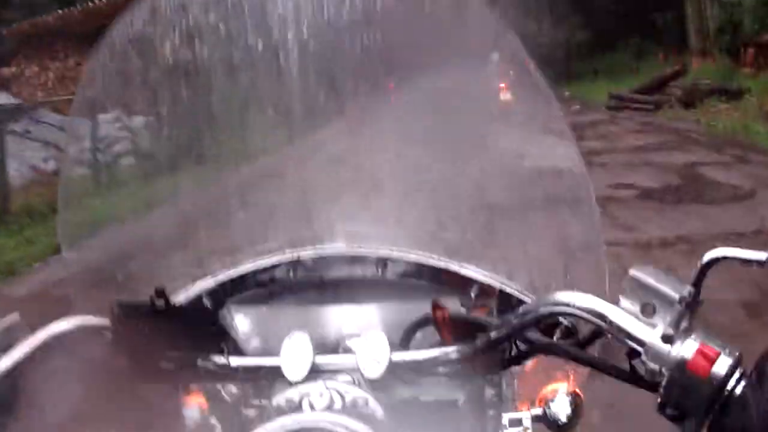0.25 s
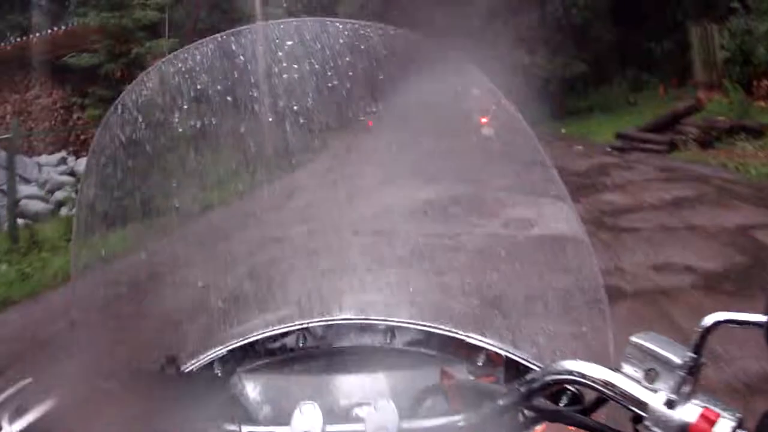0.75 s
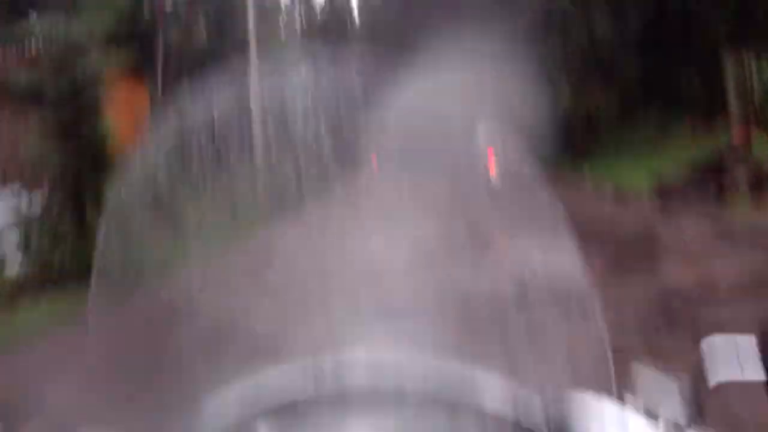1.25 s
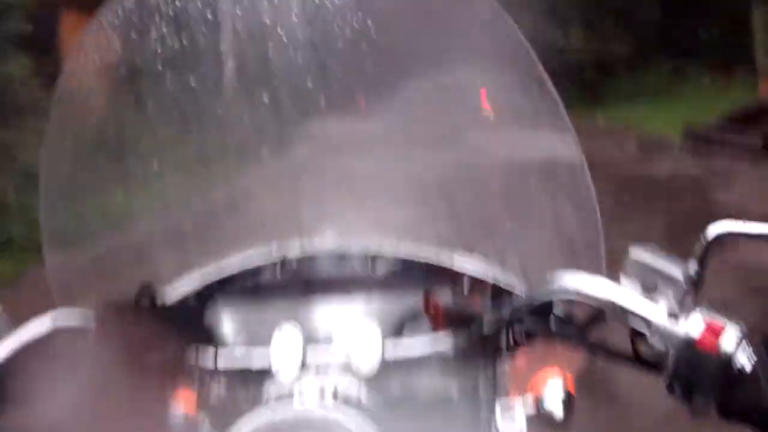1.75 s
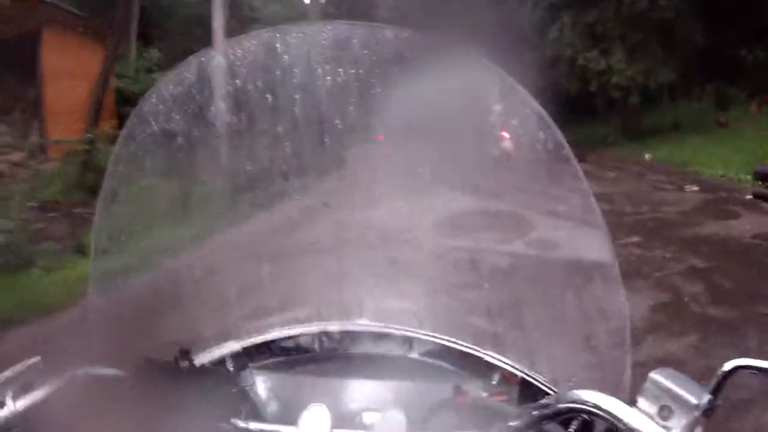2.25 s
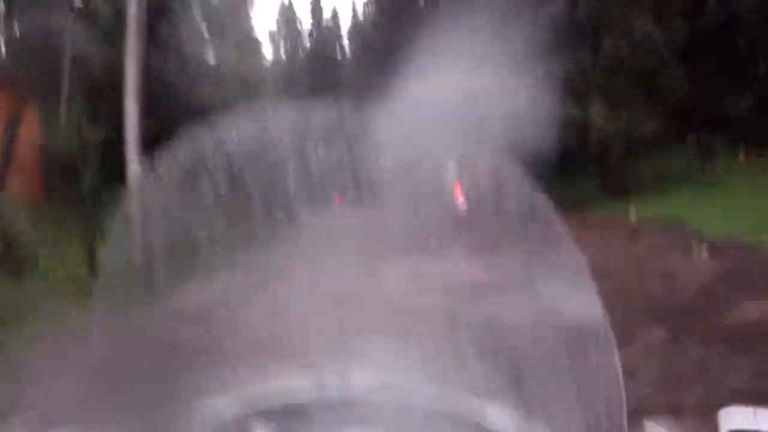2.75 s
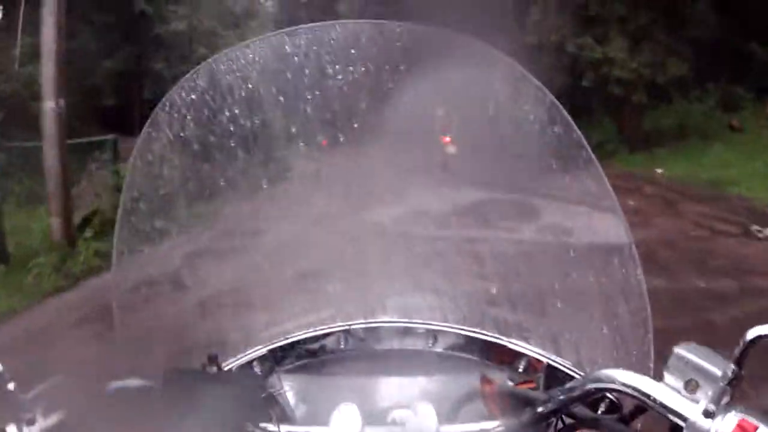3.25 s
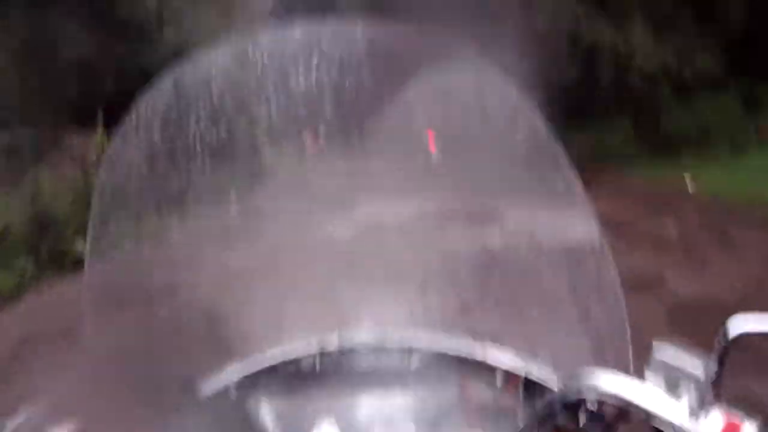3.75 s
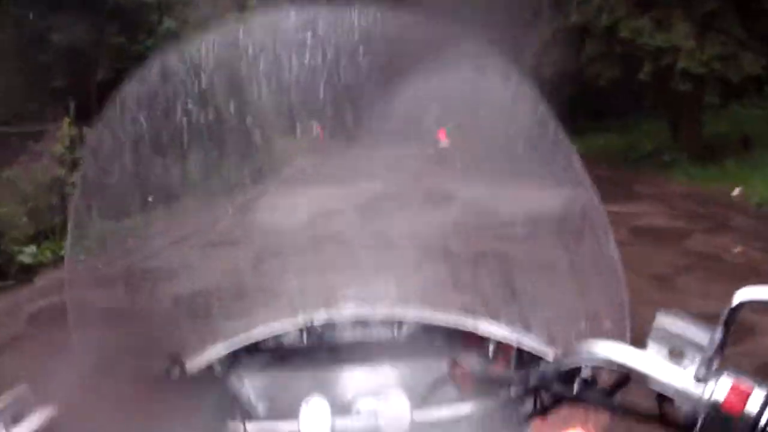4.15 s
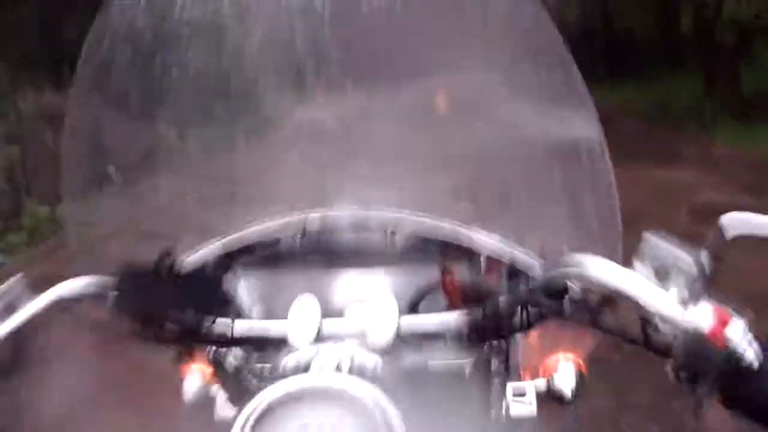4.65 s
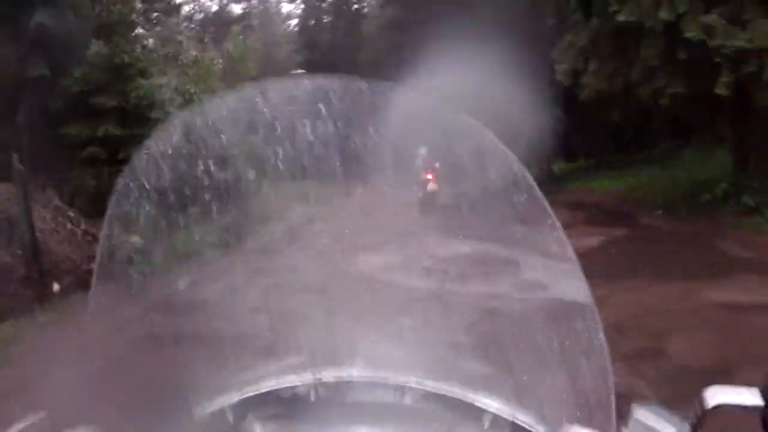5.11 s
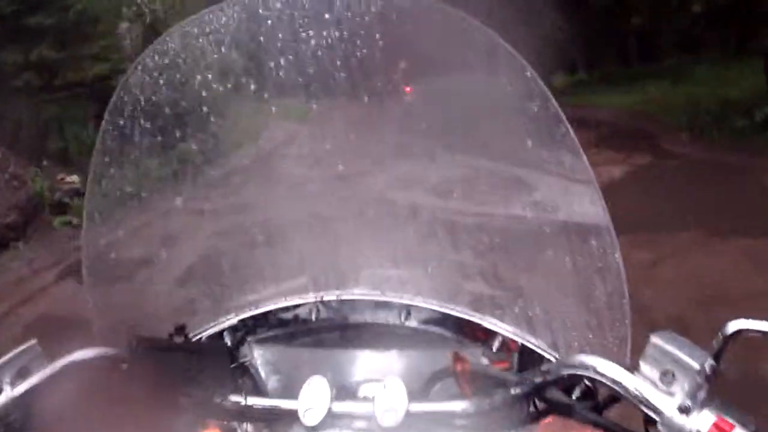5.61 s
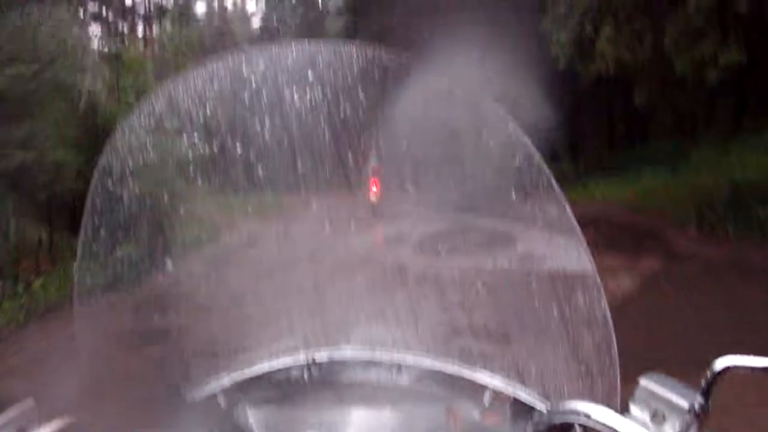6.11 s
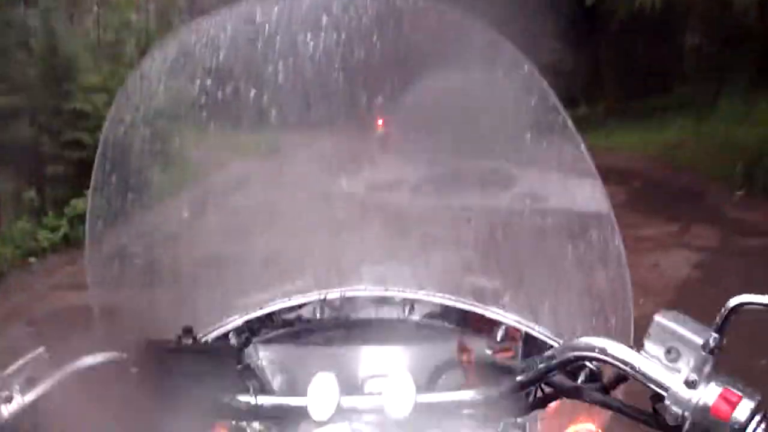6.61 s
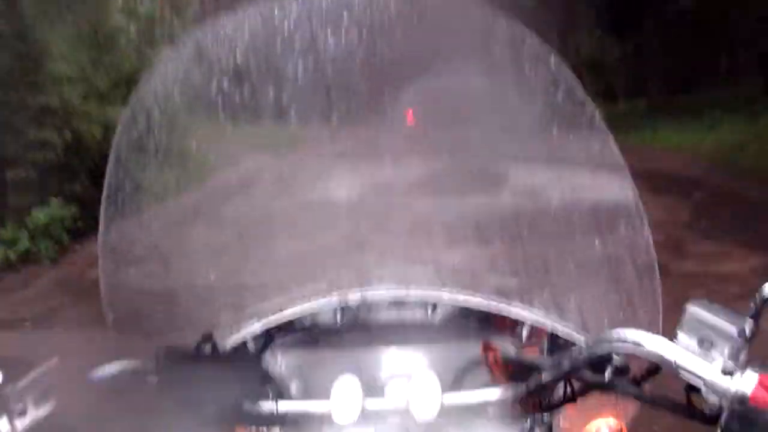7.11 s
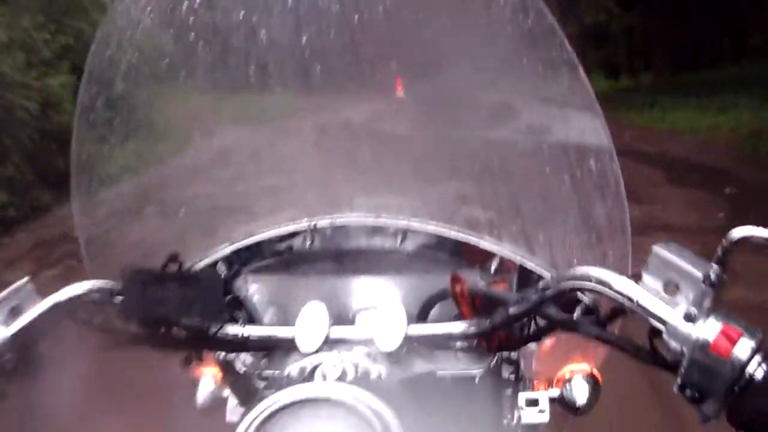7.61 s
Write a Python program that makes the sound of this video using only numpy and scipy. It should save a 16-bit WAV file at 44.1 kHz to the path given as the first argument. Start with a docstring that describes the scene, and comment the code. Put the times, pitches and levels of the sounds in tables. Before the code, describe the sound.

A V-twin motorcycle thumps along at low revs while a plastic housing rattles and raindrops tick against it.

```python
"""A wet, bumpy forest road, heard from inside a closed plastic camera housing on an idling V-twin
motorcycle. The exhaust thumps in uneven pairs as each firing rings the pipe. The housing rattles on
its mount, buzzes and ticks with raindrops, all through the same plastic resonances. Behind it sit
a faint treble ticking, rain hiss, road rumble and the slow pressure of the wind."""
import sys
import numpy as np
from scipy import signal
from scipy.fft import rfft, irfft, next_fast_len
from scipy.io import wavfile

SR = 44100
rng = np.random.default_rng(int(sys.argv[2]) if len(sys.argv) > 2 else 0)


def to_wav(s):
    """Save 16-bit WAV."""
    ch = np.atleast_2d(s).T  # columns
    pcm = np.round(np.clip(ch, -1, 1) * 32767)  # PCM
    wavfile.write(sys.argv[1], SR, pcm.astype(np.int16))


N = 347067
RUN_IN = 4410   # samples of engine before the start

# engine speed: t/s, rate/(cycles per s)
ENGINE_SPEED = [(0, 9.88), (0.27, 9.093), (0.47, 10.427), (0.68, 9.362), (1.28, 10.35), (1.38, 9.429),
                (1.79, 10.207), (2.0, 9.85), (2.29, 10.253), (2.57, 11.02), (2.67, 9.926), (3.04, 11.391),
                (3.44, 8.813), (3.65, 10.182), (4.51, 8.494), (4.72, 10.689), (4.93, 8.14), (5.04, 9.908),
                (5.28, 6.719), (5.42, 8.267), (5.89, 8.388), (6.54, 7.063), (6.68, 7.406), (7.24, 6.83),
                (7.64, 8.021), (7.87, 7.245)]
# throttle load, as the weight of the rear cylinder's thump: t/s, level/dB
THROTTLE = [(0, -19), (1.2, -20.5), (2.9, -19.5), (3.2, -21), (3.4, -24.5), (3.68, -21.5), (3.9, -27.5),
            (4.4, -23), (4.55, -20.5), (5.1, -20.5), (5.3, -26), (5.7, -27), (6.1, -27.5), (6.4, -26),
            (7.1, -27), (7.55, -22.5), (7.87, -19.5)]
# weak burns: t/s, level change/dB
STUMBLES = [(4.44, -15), (4.86, -2), (5.28, -1.5), (6.19, -6), (6.87, -5)]
def firings(first_s=.056, rear_phase=.424, front_db=-20.5, front_follows=.48, scatter_db=.67):
    """Times and gains of both cylinders' burns; the narrow V makes the gaps short, long, short, long."""
    t = np.arange(-RUN_IN, N) / SR
    phase = np.cumsum(np.interp(t, *np.transpose(ENGINE_SPEED))) / SR
    phase -= np.interp(first_s, t, phase)
    cycles = np.arange(-1, np.ceil(phase[-1]))
    front = np.interp(cycles, phase, t)
    rear = np.interp(cycles[:-1] + rear_phase, phase, t)
    times = np.r_[front, rear]
    load = np.transpose(THROTTLE)
    db = np.r_[front_db + front_follows * (np.interp(front, *load) + 20), np.interp(rear, *load)]
    for s, change_db in STUMBLES:
        db[np.argmin(abs(times - s))] += change_db
    return times, from_db(db + scatter_db * rng.standard_normal(len(db)))


# exhaust pipe resonances: f/Hz, level/dB, t60/s
PIPE_MODES = [(50.77, -20, 0.55), (57.9, -7.5, 0.2), (72, -12, 0.1), (103, -10.5, 0.084),
              (115.2, -17.5, 0.13), (231, -25.5, 0.056), (266, -19, 0.0048)]
def exhaust(lead_s=.00444, swell=.23, swell_s=.00725, soft_hz=188, crisp=3.1, echo=.19, echo_s=.03223):
    """Each firing is a small swell and then a sharp drop in pressure, and the pipe rings on."""
    times, gains = firings()
    onsets = times - lead_s
    out = 0
    for hz, db, t60 in PIPE_MODES:
        burns = gains * from_db(db + .8 * rng.standard_normal(len(times)))   # no two are alike
        if hz > 200:
            burns *= (gains / gains.mean()) ** crisp   # strong burns have a crisper edge
        push = swell * clicks(onsets - swell_s, burns) - clicks(onsets, burns)
        push -= echo * clicks(onsets + echo_s, burns)   # a weak return of the thump
        out = out + ring(push, hz, t60)
    pole = np.exp(-2 * np.pi * soft_hz / SR)   # a low-pass rounds off the thump
    return signal.lfilter([(1 - pole) ** 2], [1, -2 * pole, pole * pole], out)[RUN_IN:]


# knocks on the mount: t/s, level/dB, low-mode offset/dB, high-mode offset (hardness)/dB, scuff/ms
KNOCKS = [(0.061, -29.5, -8, -26, 3.8), (0.134, -36, -2, -9, 4.1), (0.241, -33.5, -19, -4.5, 4.8),
          (0.284, -26, -4.5, -26, 4.8), (0.329, -34, -41, -11, 2.8), (0.399, -38, -9, -20, 4.1),
          (0.476, -34, -30, -11, 2.6), (0.607, -24.5, -35, -12.5, 2.3), (0.637, -42, -30, -9, 3),
          (0.701, -27, -4.5, -20, 4.4), (0.808, -27, -15, -13, 2.9), (0.839, -42, -11, -22, 3.5),
          (0.947, -34.5, -40, -21, 1.4), (1.002, -35, -12, -20, 4.8), (1.009, -27.5, -22, -17, 1.5),
          (1.034, -32, -11, -28, 4.8), (1.046, -31.5, -14, -24, 8.5), (1.109, -35, -6, -26, 6.5),
          (1.172, -39.5, -9, -14, 3.5), (1.265, -51, -23, -25, 4.4), (1.277, -36, -15, -6, 2.2),
          (1.321, -40, -14, -4, 2.3), (1.346, -28.5, -16, -30, 6.6), (1.359, -31, -18, -19, 2),
          (1.392, -30.5, -15, -6, 6.7), (1.409, -29.5, -8, -24, 3.3), (1.545, -34.5, -12, -22, 4.3),
          (1.57, -40, -15, -14, 4.1), (1.584, -34.5, -23, -12.5, 3.1), (1.662, -38.5, -12, -15, 3.8),
          (1.721, -20, -11, -27.5, 6.1), (1.749, -36, -16, -7, 2), (1.857, -43, -25, -23, 4.3),
          (2.046, -45.5, -3, -24, 3.8), (2.066, -37, -18, -10.5, 2.6), (2.158, -36.5, -10, -13, 2.7),
          (2.201, -43.5, -8, -1, 3.7), (2.236, -43, -14, -24, 4.5), (2.272, -15, -39, -11.5, 2.4),
          (2.29, -35.5, -18, -3.5, 2.8), (2.328, -40, -5, -36, 4.7), (2.346, -32, -7.5, -32, 2.1),
          (2.38, -21.5, -19, -25, 4.7), (2.387, -20.5, -35, -26, 2), (2.438, -42, -41, -6, 2.6),
          (2.498, -40.5, -11, -25, 4.8), (2.563, -41.5, -7, -17, 3.5), (2.647, -43, -16, -16, 6.9),
          (2.681, -39, -33, -20, 3.5), (2.693, -28.5, -28, -22, 3.4), (2.753, -39.5, -23, -8, 2.7),
          (2.721, -44, -7, -18, 2.9), (2.769, -44.5, -21, -11, 2.8), (2.855, -28, -13, -13.5, 2.3),
          (2.946, -41, -8.5, -20, 4.9), (3.005, -27.5, -44, -1, 2.3), (3.195, -24.5, -18, -15, 4.2),
          (3.248, -37.5, -6, -7, 5.7), (3.292, -45, -18, -19, 2.6), (3.326, -41, -20, -29, 4.3),
          (3.377, -24, -34, -6, 0.44), (3.504, -38, -4, -16, 6.8), (3.57, -43.5, -24, -20, 2.1),
          (3.637, -25, -42, -11.5, 0.46), (3.706, -42, -22, -10, 3.5), (3.761, -34, -13, -21, 6.5),
          (3.809, -34.5, -0.5, -18, 3), (3.839, -40, -21, -7, 3), (3.877, -47, -14, -5, 6.1),
          (3.907, -36, -17, -17, 3), (4.004, -30.5, -12.5, -21, 4.5), (4.1, -38, -4, -30, 5.3),
          (4.132, -23, -25, -9, 2.3), (4.242, -43, -26, -11, 3.2), (4.257, -31.5, -26, -14, 3.9),
          (4.328, -35, -9, -32, 3.3), (4.415, -45, -22, -25, 3.1), (4.445, -44, -17, -9, 2.7),
          (4.696, -47.5, -22, -11, 3.5), (4.894, -36.5, -17, -25, 3.3), (4.961, -34, -11, -30, 4.7),
          (5.028, -37, -6, -19, 3.2), (5.035, -31.5, -7, -32, 3.9), (5.091, -34.5, -18, -9, 3.7),
          (5.132, -34.5, -22, -14, 6.4), (5.15, -39, -24, -23, 3.5), (5.175, -38, -16, -27, 6.5),
          (5.214, -29.5, -37, -10, 1.6), (5.23, -34.5, -30, -20, 3), (5.282, -41, -7, -23, 4.2),
          (5.319, -40, -7, -31, 6.1), (5.35, -22, -13.5, -23.5, 3.7), (5.364, -36, -1.5, -39, 4.8),
          (5.395, -29.5, -16, -21.5, 2.7), (5.425, -35, -7, -20, 3), (5.532, -42, -22, -5.5, 3),
          (5.796, -41.5, -5.5, -16, 5.6), (5.858, -44, -20, -12, 2.8), (5.961, -27.5, -15, -20, 9.1),
          (5.971, -31.5, -6, -17, 2.5), (5.984, -36.5, -3, -24, 3), (5.997, -26, -5, -16, 3.5),
          (6.02, -38.5, -17, -12, 2.3), (6.105, -49, -25, -11, 1.7), (6.254, -44.5, -23, -12, 2.6),
          (6.274, -35, -12, -22, 3.9), (6.293, -37, -20, -12, 2.6), (6.326, -43, -3, -26, 3.2),
          (6.347, -36.5, -11.5, -22, 4), (6.371, -42, -32, -16, 3.1), (6.433, -40.5, -32, -20, 3.5),
          (6.45, -38.5, -15, -7.5, 4.5), (6.504, -40.5, -15, -22, 2.7), (6.532, -31, -14, -16, 2.7),
          (6.56, -35.5, -25, -6, 2.7), (6.623, -38, -24, -17, 1.5), (6.71, -39, -21, -23, 9.3),
          (6.732, -36, -10.5, -19, 5.1), (6.796, -45, -6, -13, 4.2), (6.816, -39.5, -27, -15, 4.5),
          (6.913, -36.5, -11, -28, 6.6), (6.922, -31, -10, -18.5, 6.8), (6.97, -45.5, -4, -20, 3.5),
          (7.102, -20.5, -40, -12.5, 2.5), (7.147, -39, -30, -9, 2.6), (7.272, -35, -30, -13, 1.9),
          (7.313, -45.5, -33, 14, 2.9), (7.352, -44, -24, -2.5, 4.1), (7.389, -41.5, -25, -3.5, 3.4),
          (7.418, -33, -13, -8.5, 4.6), (7.454, -34, -15, -17, 5.1), (7.514, -30, -19, -14, 2.9),
          (7.57, -43, -27, -26, 2.6), (7.619, -43.5, -12, -12, 6), (7.708, -42, -22, -6, 2.3),
          (7.738, -32.5, -19, -11, 3.2), (7.769, -35, -8, -13, 2.2), (7.781, -25, -13.5, -20, 7.7)]
# a knock's mids at 1-1.35, 1.35-1.95, 1.95-2.5 kHz: offset/dB, share of hardness, dB per scuff doubling
KNOCK_MIDS = [(-9, 0.025, 1), (-11, 0.13, -2.5), (-17, 0.38, -1)]
def rattles(small_per_s=22, small_db=-52.5, usual_high_db=-16 - 1, usual_scuff_ms=3.5):
    """The housing knocks on its mount, small rattles between: drive for the six lower mode groups."""
    s, (size, low, high, length) = scattered(small_per_s)
    small = [s, small_db + 3 * size, -16 + 7 * low, -16 + 6 * high, 2 * from_db(.6 * length)]
    s, db, low_db, high_db, ms = np.hstack([np.transpose(KNOCKS), small])
    mids = [offset_db + share * (high_db - usual_high_db) + doubling_db * np.log2(ms / usual_scuff_ms)
            for offset_db, share, doubling_db in KNOCK_MIDS]
    scuffs = bursts(s, db + np.array([low_db, *mids]) + 4.5, ms, .13 * ms, lumps_db=4.5)
    # the stiff high modes feel only the first contact
    contact = bursts(s, [db + high_db], .25 * ms, .47 * ms, lumps_db=9)
    return np.vstack([scuffs, contact, contact])


# drops on the housing: t/s, level/dB, pitch/Hz, roll-off from the pitch/(dB per octave), splash/ms
RAINDROPS = [(0.022, -27.5, 9300, 25, 0.67), (0.1275, -39.5, 8800, 13, 1), (0.2424, -29, 6500, 18, 1),
             (0.33, -45, 2900, 8, 1), (0.607, -30.5, 10800, 2.5, 0.72), (0.8062, -31.5, 3600, 9, 0.98),
             (0.949, -32.5, 4040, 4, 0.46), (1.278, -38.5, 4200, 18, .94), (1.3913, -29.5, 12800, 2.5, 1),
             (1.5912, -45, 5500, 3, 0.83), (1.6618, -32.5, 6800, 25, 0.9), (1.7483, -27.5, 8700, 6, .96),
             (1.8578, -45.5, 9600, 9, .8), (2.2722, -28, 5940, -2, .67), (2.389, -21.5, 4670, -0.5, 0.74),
             (2.6815, -31.5, 12300, 7, .67), (2.7528, -46.5, 4000, 2.5, 0.44),
             (2.8577, -38, 3530, 14, 0.63), (3.0064, -18, 3840, 7, 0.31), (3.1975, -30, 4650, 9.5, 0.4),
             (3.215, -43, 5000, 10, .95), (3.376, -8, 3500, 13, 0.79), (3.638, -34.5, 9340, 6, 0.64),
             (3.684, -53, 5500, 3, .8), (4.131, -33, 4830, 8, 0.71), (5.1463, -42, 4800, 13, 0.73),
             (5.2151, -32, 10100, 2, 0.54), (5.232, -36, 9700, 7, 0.66), (5.6035, -49, 5470, 12, .7),
             (5.9963, -38, 4600, 19, 0.53), (6.0198, -48, 5000, 0, 0.37), (6.2905, -48, 3200, 10.5, .97),
             (6.5592, -35, 2930, 8, 1), (7.0996, -28.5, 10700, 14, 1), (7.2714, -43, 2900, 9, 0.99),
             (7.3135, -34.5, 3430, 0.5, 0.38), (7.42, -48, 5500, 3, 1), (7.5155, -37.5, 10100, 18, 0.86),
             (7.74, -36.5, 12700, 12, 0.49), (7.7681, -39.5, 10800, 2.5, 0.71)]
# centres of the five upper mode groups: f/Hz
SPLASH_BANDS = [3100, 5000, 7600, 10200, 13600]
def raindrops(small_per_s=2.5, small_db=-56, steeper_below=1.18):
    """Drops, with faint ones between, drive the five upper mode groups, hardest near their pitch."""
    s, (size, pitch, fall, length) = scattered(small_per_s)
    small = [s, small_db + 3 * size, 5000 * 2 ** (1.4 * pitch), 7 + 2 * fall, 1.3 * from_db(length)]
    s, db, hz, fall_db, ms = np.hstack([np.transpose(RAINDROPS), small])
    octaves = np.log2(np.c_[SPLASH_BANDS] / hz)
    loss_db = abs(fall_db * octaves * np.where(octaves < 0, steeper_below, 1))
    return bursts(s, db - loss_db, ms, .36 * ms, tail=.14)


def drop_pings(offset_db=-6.5, t60=.0048):
    """Each listed drop also rings briefly on its own pitch."""
    out, t = np.zeros(N + 600), np.arange(600) / SR
    for s, db, hz, _, ms in RAINDROPS:
        attack = 1 - np.exp(-t * 2000 / ms)
        decay = from_db(db + offset_db - 60 * t / t60)
        out[round(s * SR):][:600] += decay * attack * np.sin(2 * np.pi * hz * t)
    return out[:N]


def patter(per_s, spread_db=4):
    """Countless tiny impacts at random moments, a few larger; rms 1."""
    sizes = from_db(spread_db * np.minimum(rng.exponential(1, N), 5)) * rng.choice([-1, 1], N)
    return rms_one(sizes * (rng.random(N) < per_s / SR))


# plastic resonances: f/Hz, struck level/dB, t60/s, level in the steady buzz or rain/dB
HOUSING_MODES = [(648, -9.5, 0.034, -12.5), (711, -11, 0.13, -12), (915.5, -4.5, 0.06, -19),
                 (945, -5, 0.058, -16), (1066, 3.5, 0.022, 3), (1288, 1, 0.016, -39), (1415, -3, 0.036, -8),
                 (1570, 2.5, 0.021, 1.5), (1724, 0, 0.02, -3.5), (2216, 7.5, 0.0069, -7.5),
                 (3036, 5.5, 0.0027, 3.5), (3610, -2.5, 0.011, -7), (4150, 3, 0.0049, -3.5),
                 (5940, -5, 0.0036, -2.5), (6920, 4.5, 0.0046, -3), (9945, 7.5, 0.0031, -7),
                 (13060, 8.5, 0.0018, -5), (15100, -1, .004, -17)]
# crossovers between nine groups of modes that are struck alike: f/Hz
GROUP_EDGES = [1000, 1350, 1950, 2500, 3900, 6500, 9000, 11500]
def housing(buzz_db, rain_db):
    """Rattles, drops, patter and engine buzz all ring the same plastic shell."""
    struck = np.zeros((9, N))
    struck[:6] = rattles()
    drops = raindrops()
    struck[4:] += drops
    buzz = from_db(buzz_db - 28) * (rng.standard_normal(N) + 1.1 * patter(per_s=500))
    rain = from_db(rain_db - 18) * (rng.standard_normal(N) + .5 * patter(per_s=400))
    out = from_db(-13) * ring(drops[0], hz=350, t60=.004)   # a heavy drop also thuds
    for k, (hz, db, t60, steady_db) in enumerate(HOUSING_MODES):
        group = np.searchsorted(GROUP_EDGES, hz)
        steady = buzz if group < 4 else rain
        push = from_db(db) * struck[group] + from_db(steady_db) * steady
        out += (-1) ** k * ring(push, hz, t60)
    return out


# treble tick resonances: f/Hz, level/dB, t60/s, share of beats that sound
TICK_MODES = [(6000, -58.5, .012, .4), (8000, -63, .005, .5), (9200, -58.5, .005, .7),
              (10000, -59, .005, .7)]
def ticking(per_s=30.5, first_s=.03, jitter_s=.006, puff_ms=3.6):
    """Tiny puffs on a steady beat, some left out, ring a few treble resonances."""
    timing, accent, chance = rng.random((int(N / SR * per_s) - 1, 3)).T
    s = first_s + np.arange(len(timing)) / per_s + jitter_s * (timing - .5)
    db = [level_db + 6 * accent - 99 * (chance > share) for _, level_db, _, share in TICK_MODES]
    ms = np.full(len(s), puff_ms)
    puffs = bursts(s, db, ms, ms, tail=0)
    return sum(ring(puff, hz, t60) for puff, (hz, _, t60, _) in zip(puffs, TICK_MODES))


# EQ of the rain bed: f/Hz, relative level/dB
RAIN_EQ = [(150, 7), (250, 12), (500, 1.5), (1300, -19), (2400, -34), (5200, -36.5), (8500, -15),
           (15600, -6), (16000, -43)]
def rain_hiss(rain_db):
    """A faint wash of rain: low body, scooped mids and airy top."""
    return from_db(rain_db - 4.5) * coloured(RAIN_EQ)


# EQ of the road rumble: f/Hz, relative level/dB
ROAD_EQ = [(15, -16), (30, -8), (40, 0), (60, -4), (100, -4), (125, -2), (150, -18), (220, -35), (400, -42),
           (700, -60)]
def road_rumble(level_db=-47.5):
    """Tyres and frame shake on the rough road."""
    return from_db(level_db) * coloured(ROAD_EQ)


# wind fader before gusts: t/s, level/dB
WIND_FADER = [(0, -38), (.7, -43), (2, -34), (2.7, -43), (4.7, -44), (5.2, -38), (5.7, -45), (7.87, -52)]
def wind(band_hz=(3, 14), gust_hz=1.5, gust_db=4):
    """Slow pressure swings of the air round the housing, coming in gusts."""
    sub_band = signal.butter(3, band_hz, btype="band", fs=SR, output="sos")
    pressure = signal.sosfilt(sub_band, rng.standard_normal(N + SR))[SR:]
    gusts = np.interp(np.arange(N) / SR * gust_hz * 2 * np.pi, np.arange(200), rng.standard_normal(200))
    return from_db(faders(WIND_FADER)[0] + gust_db * gusts) * rms_one(pressure)


def from_db(db):
    """Decibels to gain."""
    return 10 ** (np.asarray(db) / 20)


def rms_one(x):
    """Scale to rms 1."""
    return x / np.sqrt(np.mean(x ** 2) + 1e-20)


def faders(rows):
    """Breakpoints to curves, one value a sample."""
    s, *columns = np.transpose(rows)
    return [np.interp(np.arange(N) / SR, s, column) for column in columns]


def coloured(eq):
    """Noise through an EQ curve, rms 1."""
    hz, db = np.transpose(eq)
    size = next_fast_len(N)
    log_hz = np.log(np.maximum(np.fft.rfftfreq(size, 1 / SR), 1))
    gains = from_db(np.interp(log_hz, np.log(hz), db))
    return rms_one(irfft(rfft(rng.standard_normal(size)) * gains, size)[:N])


def ring(push, hz, t60):
    """A resonator: a unit click starts a dying sine of height 1."""
    r, w = from_db(-60 / (t60 * SR)), 2 * np.pi * hz / SR
    return signal.lfilter([0, np.sin(w)], [1, -2 * r * np.cos(w), r * r], push + 1e-18)


def clicks(times, gains):
    """One click at each time, with a run-in before zero."""
    out = np.zeros(RUN_IN + N + SR)
    np.add.at(out, RUN_IN + np.round(times * SR).astype(int), gains)
    return out[:RUN_IN + N]


def bursts(times, db, lengths_ms, rises_ms, tail=.39, tail_stretch=3.1, lumps_db=0):
    """A noise burst per contact swells, dies and trails off; each row of db sets one track's energies."""
    out, t_ms = np.zeros((len(db), N + 3000)), np.arange(3000) / SR * 1000
    noise = rng.standard_normal((len(times), 3000))
    lumps = rng.standard_normal((len(times), 50))   # a rattle is several touches, some 1.4 ms apart
    noise *= from_db(lumps_db * np.repeat(lumps, 60, axis=1))
    for s, gains, ms, rise, grain in zip(times, from_db(db).T, np.clip(lengths_ms, .1, 15), rises_ms, noise):
        attack = 1 - np.exp(-t_ms / max(rise, .02))
        decay = np.exp(-t_ms / ms) + tail * np.exp(-t_ms / ms / tail_stretch)
        burst = grain * decay * attack
        start = round(s * SR)
        out[:, start:start + 3000] += np.outer(gains, burst / np.sqrt(np.sum(burst ** 2)))
    return out[:, :N]


def scattered(per_s):
    """Random moments at least 10 ms apart, and four normal draws for each."""
    chance = rng.random((400, 2))[:, 0]
    s = np.cumsum(-np.log(1 - chance) / per_s + .01)
    inside = s < N / SR
    return s[inside], rng.standard_normal((400, 4))[inside].T


# bed faders, ahead of each layer's trim: t/s, housing buzz/dB, rain/dB
BED_FADERS = [(0.0, -52.5, -59), (0.57, -57.5, -63), (1.25, -56, -61), (1.36, -52, -59.5),
              (1.51, -57, -60.5), (1.84, -59.5, -60), (2.24, -54, -60.5), (2.74, -56.5, -60.5),
              (2.9, -52.5, -60), (3.11, -57, -61), (3.6, -60, -61.5), (4.1, -58.5, -62.5), (5.22, -57, -61),
              (5.52, -59.5, -63.5), (6.07, -62.5, -64), (6.42, -57.5, -64), (6.77, -60, -65),
              (7.87, -58, -62.5)]
def scene():
    """Mono mix of engine, housing and weather."""
    buzz_db, rain_db = faders(BED_FADERS)
    bed = rain_hiss(rain_db) + road_rumble()
    return (exhaust() + ticking() + drop_pings() + housing(buzz_db, rain_db) + bed + wind())[None]


def record(dry):
    """The housing's air space hollows out a narrow band, and the top is cut."""
    hollow_hz, width_hz, depth, stop_hz = 2327, 350, .3, 16819
    band = signal.lfilter(*signal.iirpeak(hollow_hz, hollow_hz / width_hz, fs=SR), dry)
    high_cut = signal.cheby2(12, 70, stop_hz, fs=SR, output="sos")
    return signal.sosfilt(high_cut, dry - depth * band)


dry = scene()
out = record(dry)
to_wav(out)
```